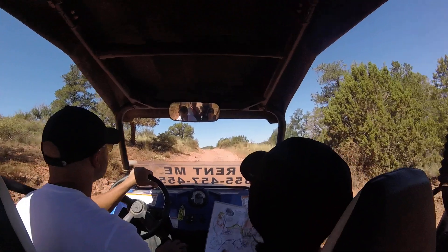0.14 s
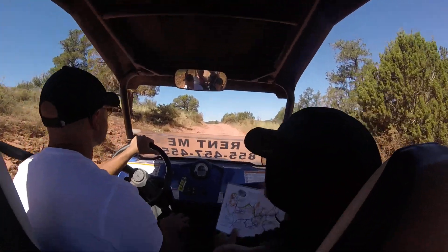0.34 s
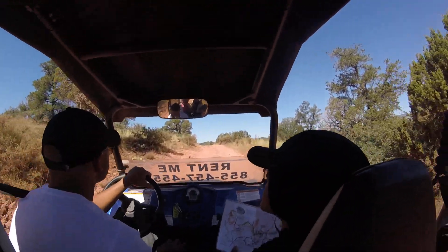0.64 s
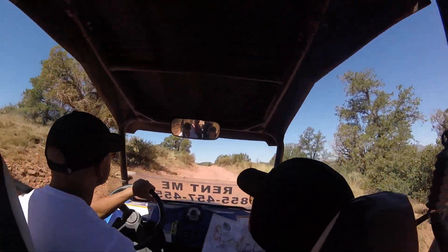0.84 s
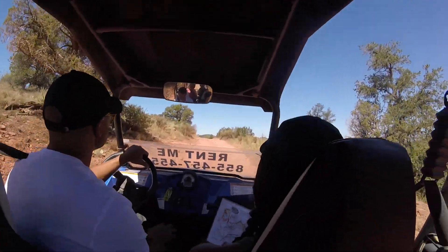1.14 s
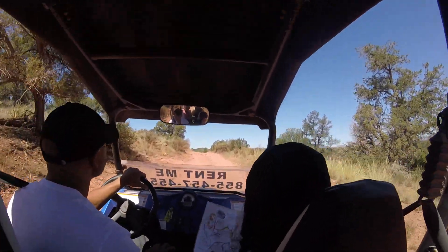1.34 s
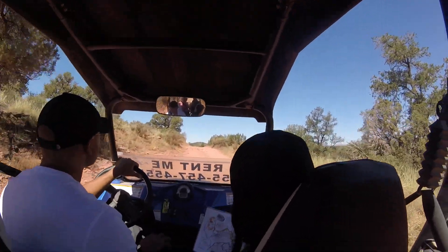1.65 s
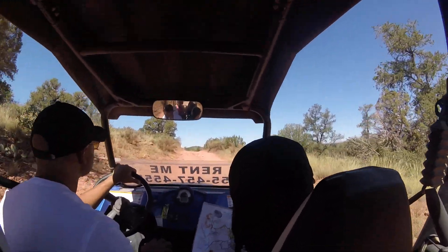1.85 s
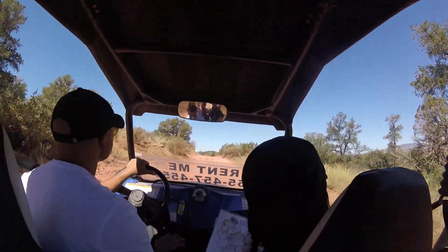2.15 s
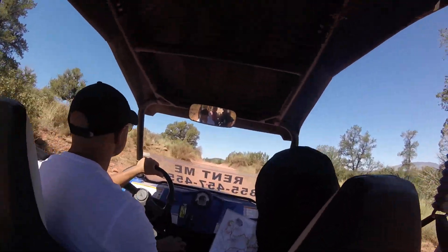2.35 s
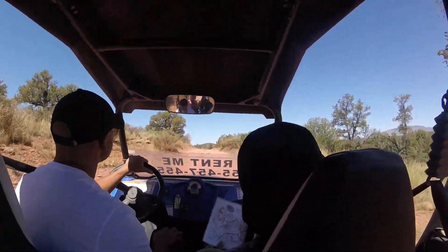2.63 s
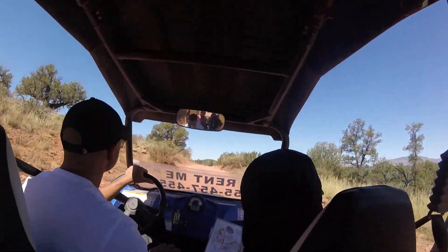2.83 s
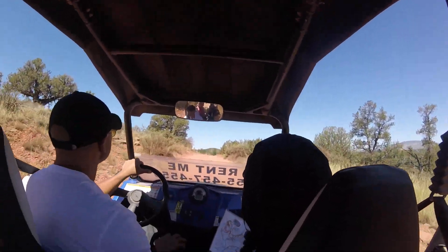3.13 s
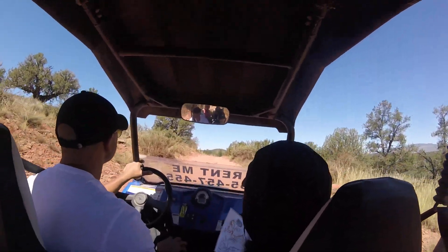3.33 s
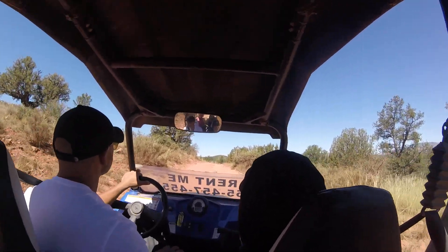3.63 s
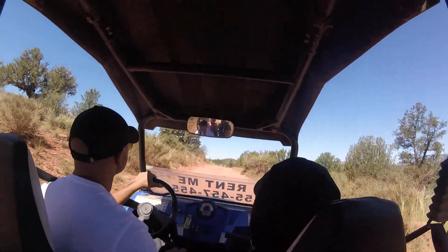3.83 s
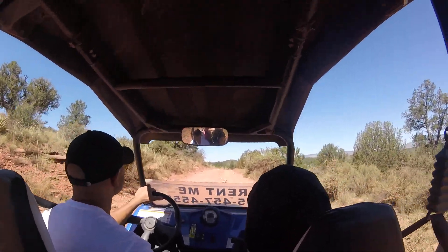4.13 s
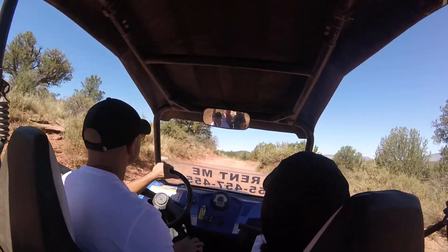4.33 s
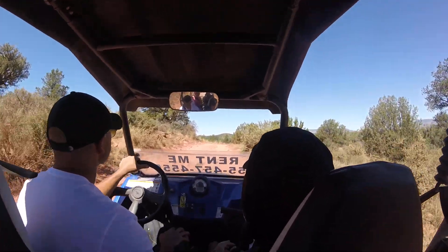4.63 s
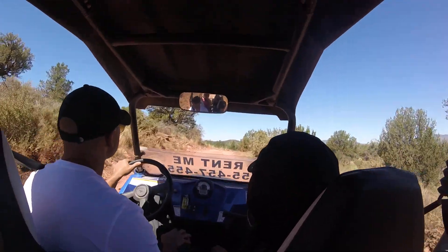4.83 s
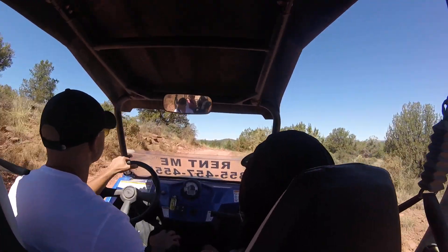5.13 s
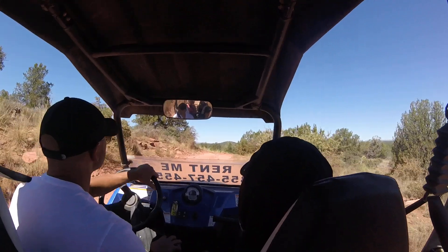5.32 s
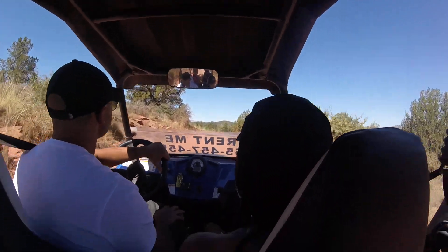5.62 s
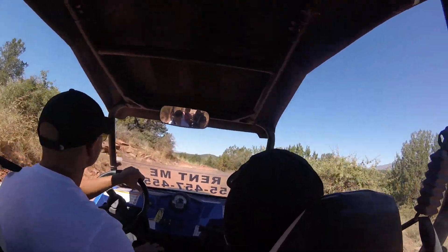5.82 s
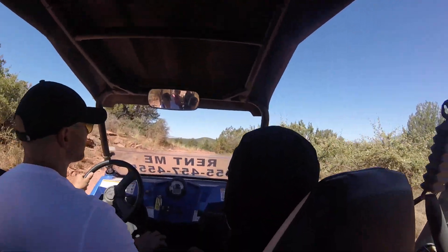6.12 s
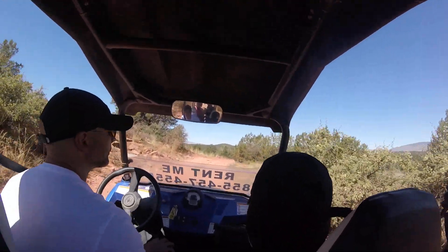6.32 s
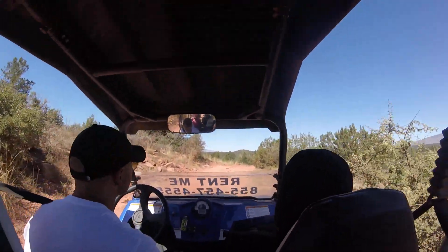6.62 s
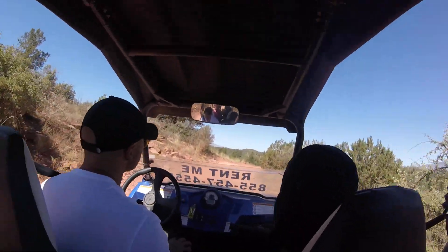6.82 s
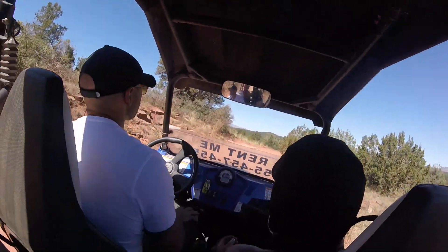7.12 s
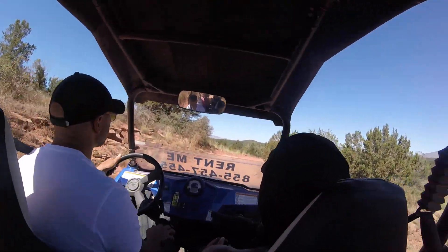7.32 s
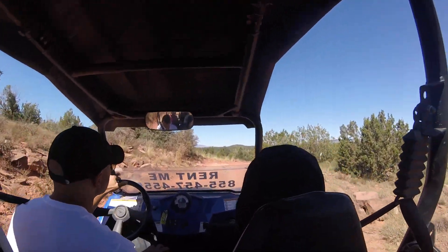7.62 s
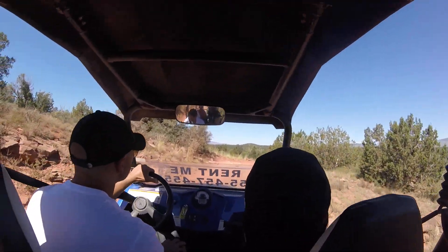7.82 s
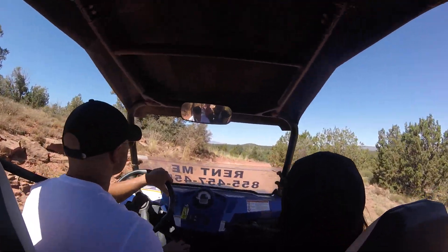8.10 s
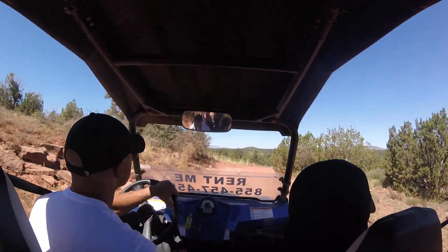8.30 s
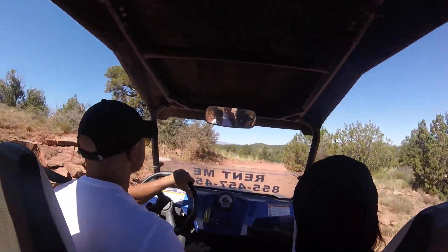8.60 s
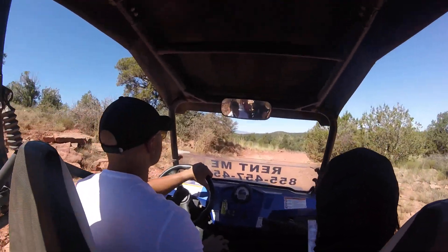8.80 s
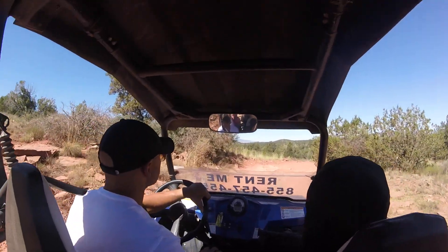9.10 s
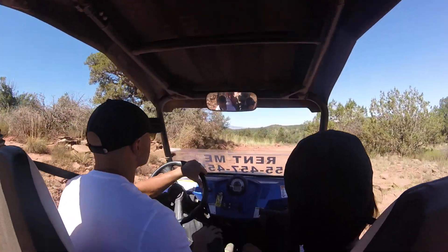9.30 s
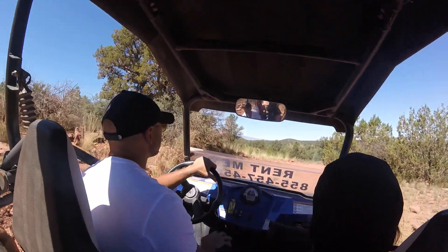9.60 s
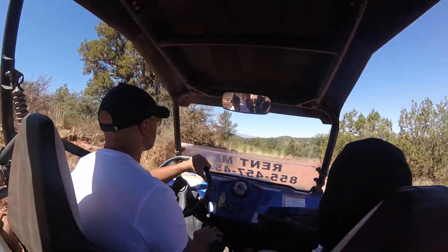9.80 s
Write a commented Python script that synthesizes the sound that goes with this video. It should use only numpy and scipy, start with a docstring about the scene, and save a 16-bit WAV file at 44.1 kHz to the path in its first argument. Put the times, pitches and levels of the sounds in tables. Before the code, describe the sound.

Inside an open off-road buggy, a droning engine cruises, sinks to a lumpy idle, then pulls hard again over bumps, gravel and buffeting wind.

```python
"""The twin-cylinder engine of a side-by-side utility vehicle, heard from the back of its open cab on a dirt trail.
It cruises, falls to idle, pulls hard and eases off: harmonics of the firing rate swell through pipe resonances.
Pulsing hiss and gravel clinks ring the engine covers, and wavering sines make the thin swells of the clutch.
Shaped noise gives wind, gusts, tyre roar, body drumming and the swish of twigs.
Stones spray the frame, bumps thud and ring the panels, and short fuzzy chirps squeak."""
import sys
import numpy as np
from scipy import signal
from scipy.fft import rfft, irfft, next_fast_len
from scipy.io import wavfile

SR = 44100
rng = np.random.default_rng(int(sys.argv[2]) if len(sys.argv) > 2 else 0)


def wav_out(sig):
    """Save sig, one row per channel (or a flat mono array), as 16-bit PCM at SR to the path in sys.argv[1]."""
    wavfile.write(sys.argv[1], SR, np.round(np.clip(np.atleast_2d(sig).T, -1, 1) * 32767).astype(np.int16))


N = 438794
TIME = np.arange(N) / SR  # s

# turbulence in the open cab: time_s, level_db
WIND_LEVEL = [(0, -28), (1.0, -32), (1.6, -33.5), (2.6, -27.5), (3.1, -21.5), (3.6, -25), (4.2, -34.5),
              (4.65, -24), (5.05, -26.5), (5.3, -30), (5.9, -31.5), (6.5, -26), (6.9, -41), (7.35, -34),
              (8.05, -38), (8.3, -37), (9.2, -32.5), (9.95, -25.5)]
# gusts on the microphone: centre_s, gain_db, length_s
WIND_GUSTS = [(.97, -19, 0.12), (1.99, -18, 0.13), (2.93, -23, 0.24), (3.19, -17.5, 0.17),
              (3.38, -23, 0.45), (9.85, -32, 0.12)]
# tone of the steady wind: frequency_hz, relative_db
WIND_SPECTRUM = [(5, -6.5), (16, 4), (27, 13), (42, 9.5), (60, 11), (100, -7.5), (250, -73)]
# tone of the gusts: frequency_hz, relative_db
GUST_SPECTRUM = [(5, -7.5), (14, 0.5), (30, 4), (55, 1), (100, -24.5), (250, -88.5)]
WIND_FLICKER_DB, WIND_FLICKER_PER_S = 1.5, 4.8  # eddies come and go: rms depth, changes per second

# tyre roar over packed dirt: time_s, level_db
TYRE_LEVEL = [(0, -36), (1.5, -38), (2.2, -42.5), (3.1, -41), (4.3, -38), (4.85, -45), (5.3, -44),
              (6.1, -39), (6.9, -36), (7.6, -41.5), (8.6, -43), (9.95, -42.5)]
# tone of the tyre roar: frequency_hz, relative_db
TYRE_SPECTRUM = [(150, -17), (350, -3.5), (450, -2), (600, 0), (750, -2), (1000, -9), (1300, -9),
                 (1800, -13), (4000, -53)]

# tone of the drumming body: frequency_hz, relative_db
BODY_SPECTRUM = [(20, -21), (45, -3), (90, 1), (150, -4), (210, -10), (270, -12), (390, -12), (450, -19),
                 (650, -30), (1500, -66)]
# drumming offset in dB, and the shares by which it follows the wind, tyre and engine levels
BODY_DB, BODY_WIND, BODY_TYRES, BODY_LOAD = 3.5, 0.33, 0.39, 0.22

# twigs sweeping along the side: centre_s, gain_db, length_s
TWIG_SWEEPS = [(5.42, -52, 0.097), (5.65, -46, 0.23), (5.76, -47, 0.15)]
# tone of the twigs: frequency_hz, relative_db
TWIG_SPECTRUM = [(700, -14), (1600, 3), (3500, 4), (6500, -4), (8500, -19), (11000, -27), (13000, -42)]

# stones and sprays of grit on the frame: start_s, level_db, decay_s, brightness_db_per_octave
STONE_HITS = [(0.395, -36, 0.025, 0), (0.652, -35, 0.027, -1), (0.765, -36.5, 0.048, 0.5),
              (1.047, -38, 0.0043, 8), (1.245, -35, 0.028, 3.5), (1.279, -32.5, 0.028, -1),
              (1.491, -33.5, 0.033, 0.5), (1.511, -33.5, 0.059, 0.5), (1.57, -36, 0.025, 1),
              (1.945, -34, 0.0032, 6), (3.147, -37, 0.048, -1.5), (3.754, -31.5, 0.0071, -4),
              (4.538, -43, 0.0044, 3), (5.702, -29.5, 0.017, -1.5), (5.712, -39, 0.014, 1),
              (5.727, -37, 0.026, -1.5), (6.044, -40, 0.031, 0), (6.235, -40.5, 0.066, 2.5),
              (6.503, -37.5, 0.026, 1), (8.153, -51, 0.0046, 13), (9.519, -42, 0.063, 2),
              (9.735, -43, 0.044, 0.5)]
# tone of a struck frame before its brightness tilt: frequency_hz, relative_db
STONE_SPECTRUM = [(400, -2), (900, 8), (2000, 4), (3500, -2.5), (5000, -10), (6500, -9), (8500, -21.5),
                  (12000, -40)]
STONE_ATTACK_S = 0.0022
SPOT_DB, SPOT_WIDTH_HZ = -13.5, 300  # level and bandwidth of the struck spot's own rings
GRIT_PER_S, GRIT_SHARE = 700, 0.55  # average strikes per second, and their weight against smooth noise

# squeaks of the seats and suspension: start_s, peak_db, pitch_hz, length_s
SQUEAK_CHIRPS = [(2.472, -49, 2174, 0.081), (6.01, -38, 1238, 0.025), (6.263, -40, 2269, 0.056),
                 (7.668, -47, 2030, 0.031), (9.725, -46, 2780, 0.045)]

# bumps through the suspension: time_s, heave_db, knock_db, knock_pitch_hz
SUSPENSION_BUMPS = [(.535, -16, -17.5, 300), (.775, -32, -16, 650), (.94, -23, -27, 150),
                    (.982, -36, -25, 750), (1.281, -17, -19, 600), (1.507, -32, -11, 650),
                    (2.714, -30, -23, 200), (2.819, -8.5, -22.5, 250), (2.962, -17, -16, 400),
                    (3.026, -8, -20, 220), (3.169, -16, -18, 453), (3.478, -7.5, -18, 400),
                    (3.763, -18, -20.5, 160), (4.568, -20, -19, 340), (4.589, -19, -23.5, 170),
                    (4.652, -22, -19.5, 280), (5.054, -13, -15.5, 475), (5.704, -33, -25, 400),
                    (6.525, -28, -21.5, 400), (6.766, -36, -14.5, 704), (8.182, -14, -26, 200),
                    (8.681, -17, -20, 300), (9.282, -20, -22, 450), (9.659, -10, -29, 250),
                    (9.788, -11.5, -15, 600)]
# nominal ringing modes of the panels: pitch_hz, relative_db, t60_s
PANEL_MODES = [(103, 5.5, 0.11), (181.2, 6, 0.086), (261, 2, 0.054), (403, -5.5, 0.043), (559, -6.5, 0.04),
               (704, -11.5, .045), (916, -11, 0.027)]
HEAVE_HZ = 46.3  # slow push of a jolt
KNOCK_OCTAVES = 1  # how widely a knock spreads over the panel modes
KNOCK_RISE_S = 0.008  # the rubber mounts soften each knock

# ground under the tyres, loud on loose gravel: time_s, level_db (gravel and engine clatter)
GROUND_LEVEL = [(0, -37), (.2, -40.5), (.75, -41), (1.2, -42), (1.93, -43.5), (1.99, -48), (2.3, -47),
                (2.6, -44), (3.5, -45), (4.0, -43), (4.5, -44.5), (4.58, -49.5), (5.05, -50), (5.7, -44),
                (5.88, -48.5), (6.0, -44), (6.6, -42), (7.1, -42.5), (7.45, -47), (7.85, -46), (8.4, -48),
                (9.0, -48), (9.5, -47.5), (9.95, -47)]
# tone of the clatter: frequency_hz, relative_db
CLATTER_SPECTRUM = [(500, -14), (900, -8), (1200, -10), (1450, -8.5), (2050, -4.5), (2350, -6),
                    (3400, -5.5), (4000, -8.5), (4500, -13.5), (5500, -16), (6900, -22.5), (7600, -28),
                    (9100, -30.5), (9900, -43), (11000, -47.5), (13000, -55.5)]
# ringing of the engine covers: pitch_hz, width_hz, relative_db
COVER_MODES = [(1172, 22, -12.5), (1280, 110, -19), (2680, 45, -25.5), (6304, 220, -14)]

# swells of the singing clutch: centre_s, level_db, length_s, pitch_hz
CLUTCH_RINGS = [(.062, -38, 0.12, 1170), (.255, -40, .14, 1172), (.38, -35, 0.17, 1160),
                (.555, -38, 0.098, 1160), (.68, -43, 0.13, 1174), (.785, -39, 0.19, 1168),
                (1.08, -40, 0.22, 1153), (1.42, -47, .25, 1172), (1.69, -43.5, 0.13, 1155),
                (1.875, -41.5, 0.32, 1172), (2.72, -43, 0.15, 1148), (3.06, -44, 0.24, 1155),
                (3.45, -45.5, 0.51, 1154), (3.76, -48, 0.28, 1144), (4.14, -43.5, 0.45, 1150),
                (4.38, -44, .24, 1144), (7.9, -52, 0.83, 1170), (8.068, -47, 0.18, 1297),
                (8.416, -55, 0.23, 1330)]
CLUTCH_FLICKER_DB, CLUTCH_WAVER_HZ = 1.5, 4.5  # rms wander of level and pitch

# engine speed: time_s, firing_rate_hz
FIRING_RATE = [(0.0, 64.4), (0.15, 62.9), (0.3, 64.0), (0.47, 62.3), (0.64, 64.7), (0.78, 63.0),
               (0.91, 60.7), (1.08, 62.8), (1.3, 61.0), (1.63, 54.8), (2.02, 52.0), (2.22, 56.3),
               (2.65, 59.2), (3.1, 61.7), (3.21, 60.9), (3.57, 62.9), (3.85, 62.2), (4.02, 62.9),
               (4.13, 61.0), (4.33, 61.2), (4.52, 49.3), (4.65, 46.9), (5.0, 37.7), (5.35, 31.6),
               (5.62, 25.3), (6.01, 23.5), (6.3, 24.0), (6.51, 23.5), (6.68, 35.6), (6.79, 44.2),
               (6.98, 42.0), (7.18, 47.1), (7.43, 50.2), (8.1, 51.2), (8.29, 55.3), (8.5, 52.2),
               (8.75, 50.0), (9.15, 45.7), (9.45, 44.8), (9.78, 39.3), (9.95, 40.6)]
# strength of the exhaust pulses under load: time_s, boom_db, bark_db
ENGINE_LOAD = [(0.0, -28, -27), (0.25, -25.5, -28.5), (0.7, -27.0, -27.5), (0.9, -26.5, -29),
               (1.15, -25.5, -28.5), (1.5, -26.5, -29.5), (1.8, -25, -29.0), (2.05, -27.5, -31),
               (2.45, -27.5, -30), (2.9, -26.5, -28.5), (3.4, -29.5, -32), (3.8, -28.5, -32),
               (4.25, -27, -29), (4.5, -30.5, -32.5), (4.7, -33.5, -37), (5.05, -33, -47),
               (5.3, -32.5, -35.5), (5.8, -28, -37), (6.1, -33.5, -35), (6.35, -28, -28), (6.6, -20.5, -28),
               (6.76, -23.5, -28), (7.0, -22.5, -28), (7.2, -25.5, -23), (7.5, -27, -24), (8.1, -26.5, -25),
               (8.3, -27, -30), (8.7, -28.5, -27), (9.1, -29.5, -34.5), (9.5, -30, -31),
               (9.95, -29.0, -34.0)]
# the engine catches and stumbles as the drive takes up slack: centre_s, change_db, length_s
ENGINE_SURGES = [(4.492, 3.5, 0.13), (5.95, 4.5, .1), (6.142, 7.5, 0.14), (6.222, -9, 0.14),
                 (6.487, -9.5, 0.18), (6.547, 2, 0.12), (8.815, -7, 0.053), (9.574, -10, 0.066),
                 (9.756, -8, 0.079)]
# the firing pattern favours some orders, one entry for each order from 1 up: relative_db
ORDER_LEVELS = [-2.5, 8, -2, 2, 2.5, -3, -3.5, -4.5, -8, -10, -10, -11, -14.5]
# how the exhaust and cab pass the higher orders: frequency_hz, gain_db
PIPE_RESPONSE = [(20, -5.5), (50, -12), (78, 1.5), (97, 5), (128, -3), (150, -7.5), (180, -10), (201, -1.5),
                 (225, -1), (255, -9), (285, -3.5), (305, -6.5), (325, -14), (360, -8), (400, -9.5),
                 (435, -25.5), (465, -12.5), (495, -10), (560, -18), (900, -20.5)]
# how the shaking frame passes the lowest order: frequency_hz, gain_db
FRAME_RESPONSE = [(24, -10.5), (43, -6.5), (50, 7.5), (58, 8.5), (64, 4.5)]
# within each pulse the bark comes first and the frame shake last: phases in radians
BARK_LEAD, FRAME_LAG = 0.16, 1
# orders waver in turbulent air: rms depth in dB, changes per second, the boom's smaller share
SWAY_DB, SWAY_PER_S, BOOM_SWAY = 1.48, 7, 0.55

EDGE_HZ = 12600  # upper edge of the finished sound


def amp(db):
    """Decibels to linear gain."""
    return 10 ** (np.asarray(db) / 20)


def unit(x):
    """Scales x to rms 1."""
    return x / np.sqrt(np.mean(x ** 2) + 1e-20)


def noise(size=N):
    """White noise, the raw rush of air and friction."""
    return rng.standard_normal(size)


def curves(rows):
    """Joins each column of a table by straight lines in time."""
    s, *columns = np.transpose(rows)
    return [np.interp(TIME, s, column) for column in columns]


def read(points, hz):
    """Reads a dB curve, joined by straight lines over log frequency."""
    point_hz, db = np.transpose(points)
    return np.interp(np.log(hz + 1), np.log(point_hz + 1), db)


def colour(x, points):
    """Filters x by a spectrum and scales it to rms 1."""
    size = next_fast_len(len(x))
    gain = amp(read(points, np.fft.rfftfreq(size, 1 / SR)))
    return unit(irfft(rfft(x, size) * gain, size)[:len(x)])


def wander(per_s, size=N):
    """Bounded random drift of rms 1, in straight lines between per_s new values a second."""
    knots = np.clip(rng.standard_normal(8192), -2, 2)
    return unit(np.interp(TIME[:size] * per_s, np.arange(len(knots)), knots))


def resonate(x, hz, width):
    """Rings a two-pole resonance, scaled to rms 1."""
    radius = np.exp(-np.pi * width / SR)
    poles = [1, -2 * radius * np.cos(2 * np.pi * hz / SR), radius ** 2]
    return unit(signal.lfilter([1, 0, -1], poles, x))


def sing(pitch):
    """A sine that follows a moving pitch in Hz."""
    return np.sin(2 * np.pi * np.cumsum(pitch) / SR)


def hump(s, length):
    """A smooth rise and fall centred on its time."""
    return np.cos(np.pi * np.clip((TIME - s) / length, -0.5, 0.5)) ** 2


def swells(rows):
    """Sums one hump of gain for each row."""
    return sum(amp(db) * hump(s, length) for s, db, length in rows)


def add(mix, s, sound):
    """Lays a sound into the mix at its start time."""
    part = mix[max(round(s * SR), 0):][:len(sound)]
    part += sound[:len(part)]


def wind(wind_db):
    """Air tumbling through the cab as flickering low noise, with deeper gusts on the microphone."""
    level_db = wind_db + WIND_FLICKER_DB * wander(WIND_FLICKER_PER_S)
    buffet = amp(level_db) * colour(noise(), WIND_SPECTRUM)
    gusts = swells(WIND_GUSTS) * colour(noise(), GUST_SPECTRUM)
    return buffet + gusts


def tyre_roar(tyres_db):
    """Tyres on packed dirt, as shaped noise with slow and fast unevenness."""
    level_db = tyres_db + 1.4 * wander(16) + 0.63 * wander(90)
    return amp(level_db) * colour(noise(), TYRE_SPECTRUM)


def body_drum(wind_db, tyres_db, boom_db, turns):
    """Body panels as low noise that throbs with each firing and follows wind, tyres and engine load."""
    followed_db = BODY_WIND * wind_db + BODY_TYRES * tyres_db + BODY_LOAD * boom_db
    level_db = BODY_DB + followed_db + 1.3 * wander(14)
    throb = unit(1 + 0.36 * np.cos(2 * np.pi * turns))
    return amp(level_db) * throb * colour(noise(), BODY_SPECTRUM)


def brush():
    """A bright, scratchy swish of many small twigs, from noise with a rapidly varying level."""
    scratches = noise() * amp(2.7 * wander(500))
    return swells(TWIG_SWEEPS) * colour(scratches, TWIG_SPECTRUM)


def stones():
    """Sprays crack in, skitter in separate strikes and die; each struck spot rings at its own pitches."""
    out, t = np.zeros(N), TIME[:9000]
    for s, db, decay, bright_db in STONE_HITS:
        envelope = np.minimum(t / STONE_ATTACK_S, 1) * np.exp(-(t / decay) ** 2)
        hits = rng.random(len(t)) < GRIT_PER_S / SR
        strikes = unit(rng.choice([-1, 1], len(t)) * hits)
        drive = GRIT_SHARE * strikes + (1 - GRIT_SHARE) * noise(len(t))
        spot = unit(sum(resonate(drive, hz, SPOT_WIDTH_HZ) for hz in rng.uniform(1120, 7000, 4)))
        # brightness tilts the spectrum around 2 kHz
        tilted = [(hz, ring_db + bright_db * np.log2(hz / 2000)) for hz, ring_db in STONE_SPECTRUM]
        add(out, s, amp(db) * envelope * colour(unit(drive) + amp(SPOT_DB) * spot, tilted))
    return out


def squeaks():
    """Short, fuzzy chirps where parts rub as the frame twists: sines with fast pitch jitter."""
    out = np.zeros(N)
    for s, db, hz, length in SQUEAK_CHIRPS:
        size = round(length * SR)
        pitch = hz * (1 + 0.0085 * wander(400, size))
        add(out, s, amp(db) * signal.windows.tukey(size, 0.7) * sing(pitch))
    return out


def bumps():
    """Each jolt heaves the cab and rings panels near its pitch; a lighter knock follows as the load settles."""
    out, t = np.zeros(N), TIME[:9000]
    for s, heave_db, knock_db, knock_hz in SUSPENSION_BUMPS:
        cycles = t * HEAVE_HZ - 1
        heave = np.sin(2 * np.pi * cycles) * np.exp(-(2 * cycles) ** 2)
        add(out, s - 0.008, amp(heave_db) * heave)
        for delay, settle_db in [(0, 2.5), (0.013, -2)]:  # s, dB
            for hz, mode_db, t60 in PANEL_MODES:
                nearness = np.exp(-(np.log2(hz / knock_hz) / KNOCK_OCTAVES) ** 2 / 2)
                pitch = hz * rng.uniform(0.92, 1.058)
                ring = amp(mode_db - 60 * t / t60) * np.sin(2 * np.pi * pitch * t)
                rise = np.minimum(t / KNOCK_RISE_S, 1)
                add(out, s + delay, amp(knock_db + settle_db) * nearness * ring * rise)
    return out


def gravel():
    """Pebbles of many sizes clink under the tyres, each with a short ring; high ones die sooner."""
    out, t = np.zeros(N), TIME[:1300]
    for hz in np.geomspace(900, 7000, 36):
        starts = rng.integers(0, N - len(t), 200)
        levels_db = 0.9 * np.minimum(rng.exponential(1, 200), 4.5)
        clink = np.exp(-t * hz / 7) * np.sin(2 * np.pi * hz * t)
        for start, db in zip(starts, levels_db):
            add(out, start / SR, amp(db) * clink)
    return unit(out)


def clatter(turns, level_db):
    """Hiss that pulses with each firing, mixed with gravel, rings the engine covers."""
    pulsing = 1 + 0.022 * np.cos(2 * np.pi * turns) + 0.04 * np.cos(4 * np.pi * turns)
    hiss = unit(pulsing * noise())
    drive = unit(hiss + 0.38 * gravel()) * amp(0.89 * wander(30))
    covers = sum(amp(db) * resonate(drive, hz, width) for hz, width, db in COVER_MODES)
    treble_loss = signal.butter(6, 7400, fs=SR)
    rattle = amp(0.5) * colour(drive, CLATTER_SPECTRUM)
    return amp(level_db) * (rattle + signal.lfilter(*treble_loss, covers))


def clutch():
    """A thin, wavering sine that comes in swells, each with its own centre pitch."""
    out = np.zeros(N)
    for s, db, length, hz in CLUTCH_RINGS:
        size = round(length * SR)
        gain = amp(db + CLUTCH_FLICKER_DB * wander(28, size)) * np.hanning(size)
        pitch = hz + CLUTCH_WAVER_HZ * wander(70, size)
        add(out, s - length / 2, gain * sing(pitch))
    return out


def exhaust(turns, speed, boom_db, bark_db, wind_db):
    """One compact pulse a firing: each order swells as engine speed carries it through a resonance."""
    lumpy_db = np.interp(speed, [24, 32], [1.3, 0.3])  # combustion is uneven at idle
    surge_db = sum(db * hump(s, length) for s, db, length in ENGINE_SURGES)
    strength = amp(lumpy_db * wander(26) + surge_db)
    sway_db = SWAY_DB * np.interp(wind_db, [-42, -31], [0.3, 1])
    out = np.zeros(N)
    for order, order_db in enumerate(ORDER_LEVELS, 1):
        # the three lowest orders boom, the rest bark
        load_db, sway = (boom_db, BOOM_SWAY) if order <= 3 else (bark_db, 1)
        force_db = order_db + load_db + sway * sway_db * wander(SWAY_PER_S)
        path, lag = (FRAME_RESPONSE, FRAME_LAG) if order == 1 else (PIPE_RESPONSE, 0)
        phase = 2 * np.pi * order * turns + BARK_LEAD * order ** 2 - lag
        out += amp(force_db + read(path, order * speed)) * np.sin(phase)
    return np.sqrt(2) * strength * out


def scene():
    """Engine speed, load, ground and wind drive the running layers; the separate events come on top."""
    speed, = curves(FIRING_RATE)
    boom_db, bark_db = curves(ENGINE_LOAD)
    ground_db, = curves(GROUND_LEVEL)
    wind_db, = curves(WIND_LEVEL)
    tyres_db, = curves(TYRE_LEVEL)
    jitter = np.interp(speed, [23.5, 26], [0.02, 0.002])  # firings come loosely at idle
    turns = np.cumsum(speed * (1 + jitter * wander(25))) / SR  # one turn a firing
    patches_db = 0.29 * wander(15)  # gravel lies unevenly
    ride = wind(wind_db) + tyre_roar(tyres_db) + body_drum(wind_db, tyres_db, boom_db, turns)
    events = brush() + stones() + squeaks() + bumps()
    engine = clatter(turns, ground_db + patches_db) + clutch()
    engine += exhaust(turns, speed, boom_db, bark_db, wind_db)
    return (ride + events + engine)[None]


def record(dry):
    """Rounds off the loudest peaks with a soft knee, then limits the band with a low-pass."""
    knee, room = 0.56, 0.19  # where rounding starts, and the headroom above it
    over = np.maximum(abs(dry) - knee, 0)
    rounded = dry - np.sign(dry) * (over - room * np.tanh(over / room))
    low_pass = signal.firwin(255, EDGE_HZ, window=("kaiser", 9), fs=SR)
    return signal.oaconvolve(rounded, low_pass[None], "same")


dry = scene()
out = record(dry)
wav_out(out)
```